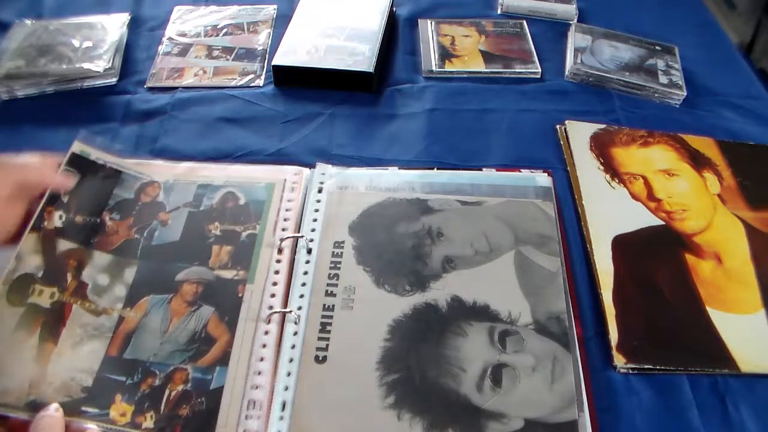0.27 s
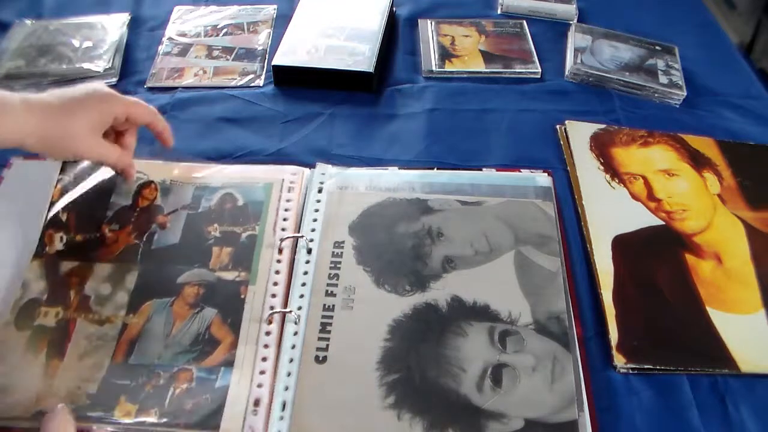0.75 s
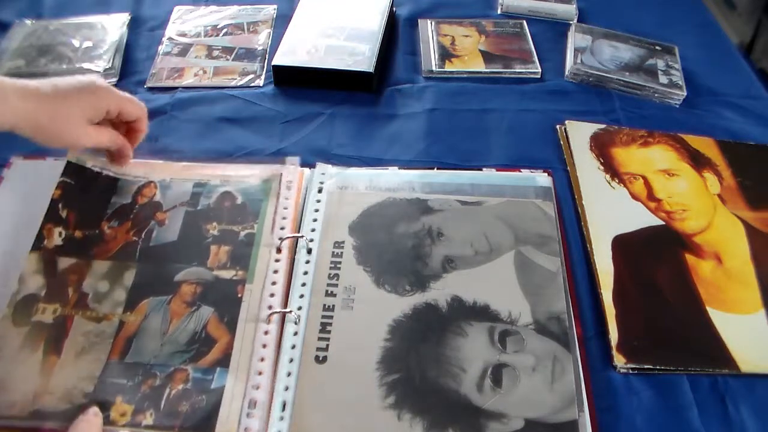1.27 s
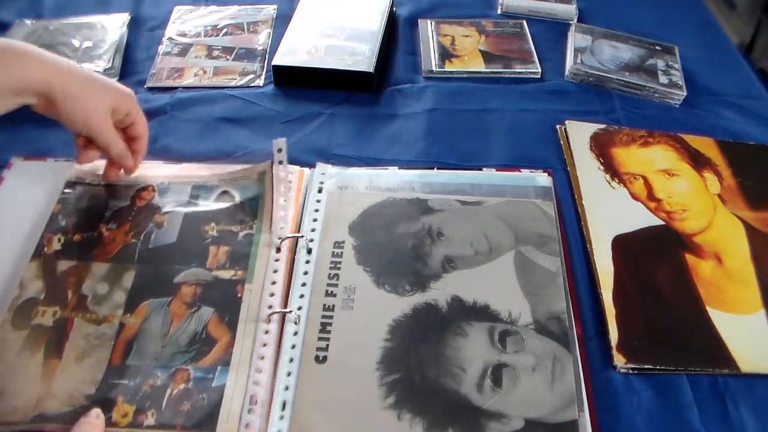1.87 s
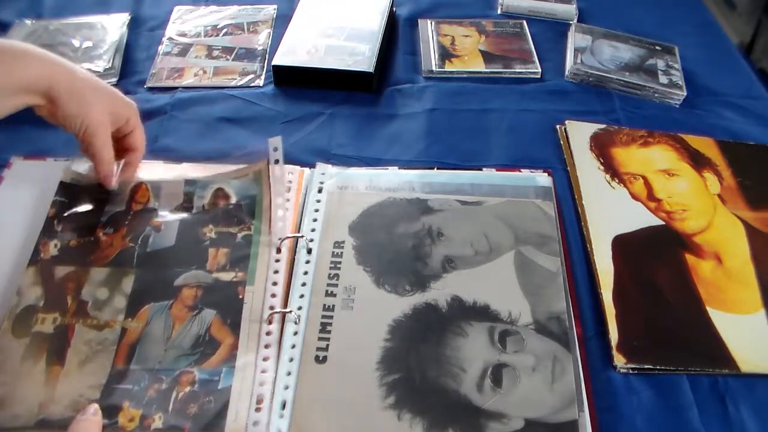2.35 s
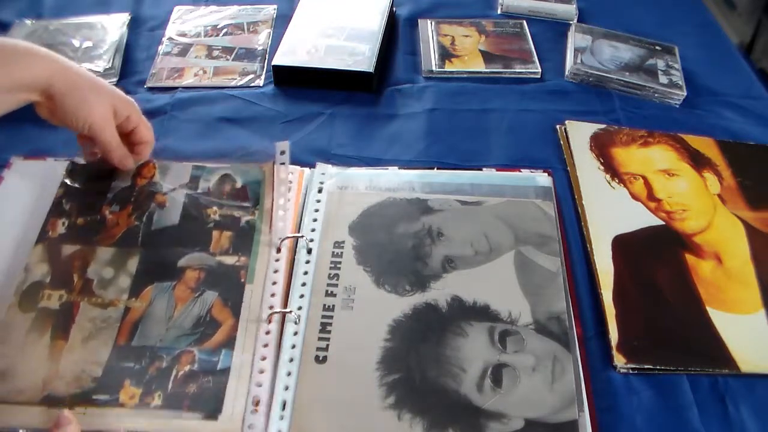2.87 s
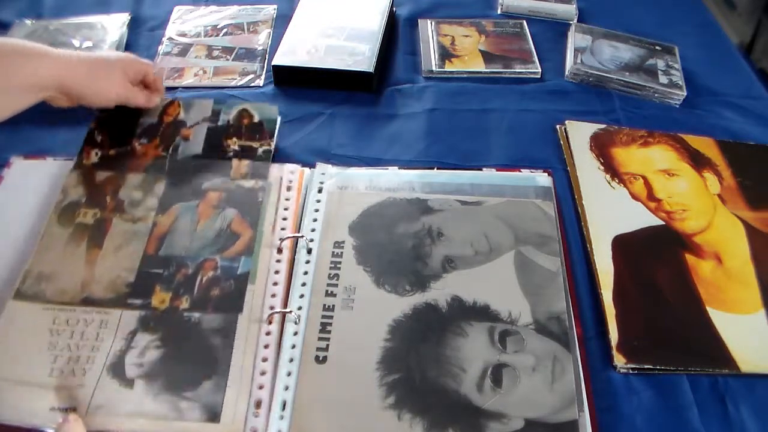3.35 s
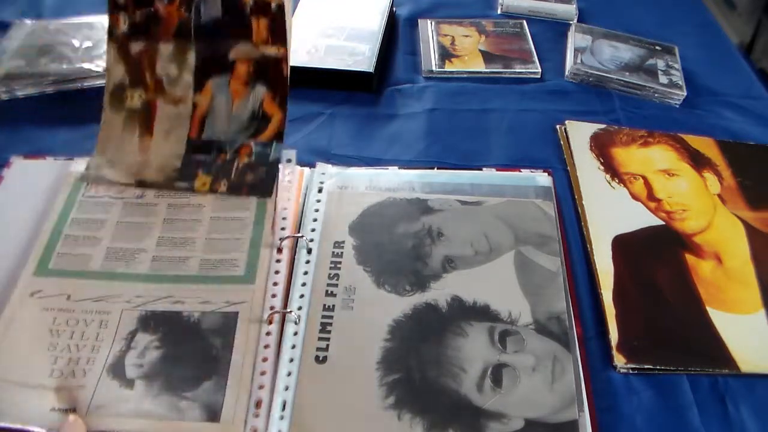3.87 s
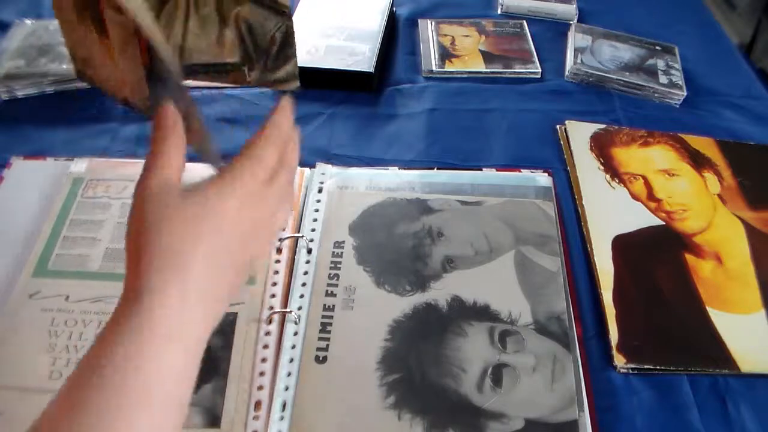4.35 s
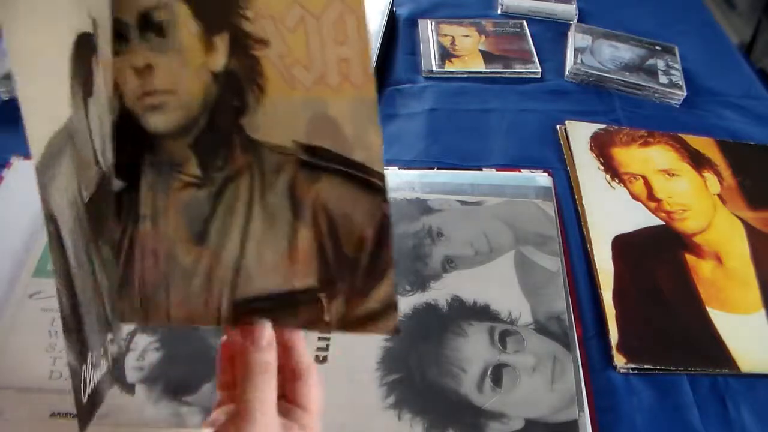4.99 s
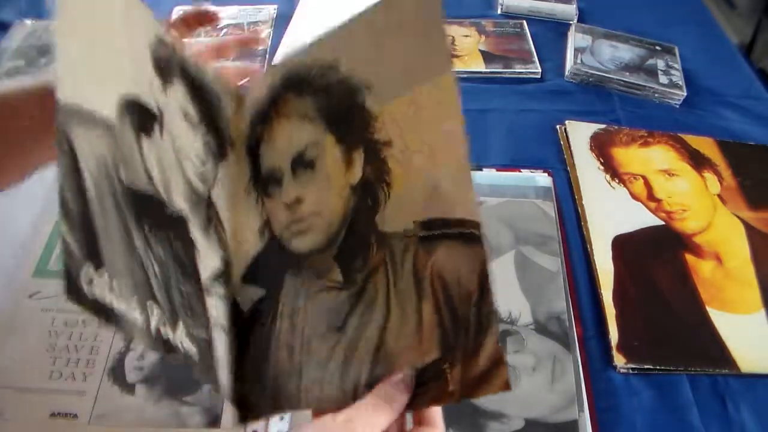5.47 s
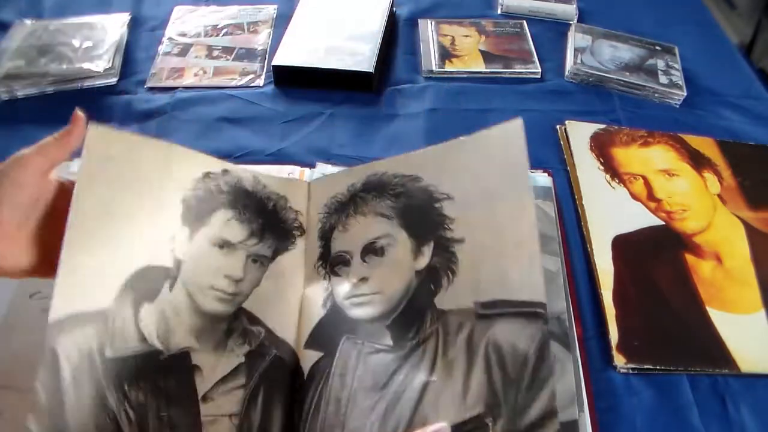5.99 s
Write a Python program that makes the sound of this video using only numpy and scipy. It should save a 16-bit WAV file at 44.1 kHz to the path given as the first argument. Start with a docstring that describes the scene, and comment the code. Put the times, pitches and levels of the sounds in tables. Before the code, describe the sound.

Close stereo pickup at a table in a small room. Fingers fuss with a clear plastic sleeve: quiet crinkles, dry ticks and thin hissing rubs in uneven tugs. A longer sliding pull draws a glossy sheet free with a few paper pops. The stiff sheet murmurs and buckles softly, fingertips brush it, then it snaps open loudly and rattles briefly. Faint rumble, hiss and low hum underneath.

```python
"""Fingers work a folded glossy sheet loose from a plastic binder sleeve, at a cloth-covered table in a small room.
The sleeve's crinkle, sliding hiss and rub are chance slips, ringing small facets and coloured by filters.
Creases snap as short bursts through resonances; the freed sheet murmurs, buckles in flurries and pops open.
Two close microphone ports hear it with short room reflections, over faint rumble, hiss and hum."""
import sys
import numpy as np
from scipy import signal
from scipy.fft import rfft, irfft, next_fast_len
from scipy.io import wavfile
from scipy.ndimage import uniform_filter1d

SR = 44100
rng = np.random.default_rng(int(sys.argv[2]) if len(sys.argv) > 2 else 0)


def generate_wav(sig):
    """Save sig (samples, or channels by samples) to the path in sys.argv[1] as 16-bit PCM at SR."""
    pcm = np.round(np.clip(np.atleast_2d(sig).T, -1, 1) * 32767).astype(np.int16)
    wavfile.write(sys.argv[1], SR, pcm)


N = 274610
TIME = np.arange(N) / SR  # seconds

# The long pull that draws the sheet free of the sleeve.
# Each row: time in seconds, sliding hiss drive in dB, crinkle drive in dB.
LONG_PULL = [(3.26, -59.5, -65), (3.45, -58.5, -69), (3.59, -62.5, -59), (3.78, -55, -67), (3.87, -48, -58),
             (3.94, -54, -50.5), (4.14, -56.5, -54), (4.21, -43.5, -47.5), (4.26, -66, -47.5)]
# Colour of the stiff paper. Each row: frequency in Hz, relative density in dB per Hz.
PAPER_COLOUR = [(70, -6), (130, -12), (300, 1), (550, 4), (800, -4.5), (1100, -4), (1650, -2.5),
                (2000, -6.5), (2450, -6), (3600, -7), (5000, -13), (8000, -13), (14000, -28)]


def from_db(db):
    """Decibels to gain."""
    return 10 ** (np.asarray(db) / 20)


def rms_one(x):
    """Scale to rms 1."""
    return x / np.sqrt(np.mean(x ** 2) + 1e-20)


def gains_in_time(rows):
    """One gain curve per dB column, fading quickly outside the span of the rows."""
    s, *columns = np.transpose(rows)
    outside = np.maximum(np.maximum(s[0] - TIME, TIME - s[-1]), 0)
    fade = np.exp(-outside / 0.013)
    return [from_db(np.interp(TIME, s, column)) * fade for column in columns]


def strokes(starts, lengths, levels_db):
    """Gain of finger strokes: each rises, holds for its length and dies away; overlaps add in power."""
    attack_s, release_s = 0.0073, 0.019
    power = 0
    for s, length, db in zip(starts, lengths, levels_db):
        # half way up at the start time
        attack = np.clip((TIME - s) / attack_s + 0.5, 0, 1)
        release = np.exp(-np.maximum(TIME - s - length, 0) / release_s)
        power = power + (from_db(db) * attack * release) ** 2
    return np.sqrt(power)


def at_hz(points, size):
    """Read a table on the frequency grid of an FFT, along log frequency."""
    hz, value = np.transpose(points)
    return np.interp(np.log(np.fft.rfftfreq(size, 1 / SR) + 1), np.log(hz), value)


def colour(x, spectrum):
    """Causal (minimum-phase) filter with the given spectrum; rms 1."""
    size = 2048
    # folding the cepstrum onto its first half puts the energy as early as it can be
    cepstrum = irfft(np.log(from_db(at_hz(spectrum, size))))
    cepstrum[1:size // 2] *= 2
    cepstrum[size // 2 + 1:] = 0
    response = irfft(np.exp(rfft(cepstrum)))
    return rms_one(signal.fftconvolve(x, response[None])[:, :x.shape[1]])


def resonate(x, hz, width_hz):
    """Two-pole resonance with gain 1 on top."""
    r = np.exp(-np.pi * width_hz / SR)
    zeros = np.array([1, 0, -1]) * (1 - r * r) / 2
    poles = [1, -2 * r * np.cos(2 * np.pi * hz / SR), r * r]
    return signal.lfilter(zeros, poles, x + 1e-18)


def low_pass(x, hz, order=2):
    """Butterworth low-pass."""
    return signal.sosfilt(signal.butter(order, min(hz, 0.45 * SR), fs=SR, output="sos"), x)


def high_pass(x, hz):
    """Butterworth high-pass."""
    return signal.sosfilt(signal.butter(2, min(hz, 0.45 * SR), "high", fs=SR, output="sos"), x)


def drift(rate):
    """Slow chance: straight lines between random knots of spread 1, so many knots a second."""
    knots = np.arange(0, TIME[-1] + 1, 1 / rate)
    return np.interp(TIME, knots, rng.standard_normal(len(knots)))


def grains(per_s, spread_db, size):
    """Tiny slips at random moments, mostly weak and a few strong; rows are mid and side; rms 1."""
    born = rng.random((2, size)) < per_s / SR
    strength = from_db(spread_db * np.minimum(rng.exponential(1, (2, size)), 4))
    sign = rng.choice([-1, 1], (2, size))
    return rms_one(born * strength * sign)


def facets(clicks, low_hz, high_hz, sharpness, count=14):
    """Each slip rings one small facet of the sheet, dealt at random, each with its own pitch; rms 1."""
    dealt = rng.integers(0, count, clicks.shape[1])
    pitches = np.geomspace(low_hz, high_hz, count)
    return rms_one(sum(resonate(clicks * (dealt == k), hz, hz / sharpness) for k, hz in enumerate(pitches)))


def sleeve_effort():
    """Gains of crinkle and hiss: a light hold, the tugs, and the two pulls."""
    # Fingers tug at the sleeve.
    # Each row: start in seconds, length in seconds, crinkle drive in dB, sliding hiss drive in dB.
    tugs = [(0.0, 0.025, -47, -60.5), (0.202, 0.014, -55.5, -61), (0.489, 0.1, -53.5, -60.5),
            (0.611, 0.19, -57, -68.5), (0.837, 0.086, -54.5, -79), (0.996, 0.18, -57.5, -57),
            (1.261, 0.22, -56, -56.5), (1.508, 0.088, -60, -57), (1.624, .09, -52, -52),
            (1.835, 0.2, -57.5, -55.5), (2.03, 0.11, -63.5, -59), (2.18, 0.1, -54, -49.5),
            (2.462, 0.13, -54.5, -54), (2.708, 0.065, -51.5, -53.5), (2.802, 0.055, -50, -50),
            (2.93, 0.056, -43, -61), (3.612, 0.046, -51.5, -57.5)]
    # The first, short pull. Each row: time in seconds, sliding hiss drive in dB, crinkle drive in dB.
    short_pull = [(2.87, -51, -54), (3.02, -51.5, -51), (3.12, -45.5, -51.5), (3.26, -62.5, -65)]
    hold_crinkle_db, hold_hiss_db = -63.5, -65.5
    starts, lengths, crinkle_db, hiss_db = np.transpose(tugs)
    pull_hiss, pull_crinkle = np.maximum(gains_in_time(short_pull), gains_in_time(LONG_PULL))
    # until the pulls begin the hand keeps a light hold on the film
    held = TIME < short_pull[0][0]
    crinkle = np.hypot(strokes(starts, lengths, crinkle_db), pull_crinkle + held * from_db(hold_crinkle_db))
    hiss = np.hypot(strokes(starts, lengths, hiss_db), pull_hiss + held * from_db(hold_hiss_db))
    return crinkle, hiss


def sleeve(crinkle, slide):
    """The film crinkles in clumps, hisses against the gloss and rubs on the pages below."""
    # Colours of crinkling film, sliding hiss and rub on the pages.
    # Each row: frequency in Hz, relative density in dB per Hz.
    film_colour = [(600, -21), (1050, -16.5), (1450, 5), (2100, 4.5), (2700, 4.5), (3500, 2), (4600, -1),
                   (7000, -4.5), (14000, -41)]
    slide_colour = [(1500, -29), (3500, 0.5), (5200, 0.5), (7000, 1.5), (8200, -1.5), (9500, 1.5),
                    (12000, -2.5), (14000, -3)]
    rub_colour = [(90, -12), (180, -9), (300, -3.5), (420, 7), (620, 1), (850, 2.5), (1200, -5),
                  (2500, -38)]
    # rub level at a usual crinkle, and the share of the crinkle's swing in dB that the rub follows
    rub_db, usual_crinkle_db, rub_follows = -64.5, -54, 0.69

    slips = grains(per_s=1400 * from_db(3.1 * drift(35)), spread_db=3.0, size=N)
    ringing = facets(slips, low_hz=1300, high_hz=7000, sharpness=6)
    film = colour(ringing + slips, film_colour)

    fine_slips = grains(per_s=8000 * from_db(2.8 * drift(60)), spread_db=0.5, size=N)
    hiss = colour(fine_slips + 0.39 * slips, slide_colour)

    page_slips = grains(per_s=2400, spread_db=4.0, size=N)
    pages = colour(slips + 0.28 * page_slips, rub_colour)
    rub = from_db(rub_db) * (crinkle / from_db(usual_crinkle_db)) ** rub_follows
    return from_db(-2.07) * crinkle * film + from_db(2.5) * slide * hiss + rub * pages


def background():
    """Even rumble and hiss from filtered noise, with a low electrical hum common to both ports."""
    # Colour of the room tone. Each row: frequency in Hz, relative density in dB per Hz.
    tone_colour = [(10, 2), (35, -6), (70, -2.5), (130, -8), (280, -12), (550, -15.5), (1200, -20),
                   (2700, -18.5), (7000, -23), (14000, -25.5)]
    # How alike the two ports hear the room tone. Each row: frequency in Hz, likeness from -1 to 1.
    tone_likeness = [(70, 0.11), (150, 0.18), (500, 0.12), (2000, 0), (6000, 0.039), (14000, 0)]
    # The hum's multiples in rising order. Each entry: rms level in dB.
    hum_levels_db = [-58.5, -64, -86, -84.5, -86]
    room_tone_db, hum_hz = -57.5, 25
    hiss = from_db(room_tone_db) * colour(rng.standard_normal((2, N)), tone_colour)
    hum = 0
    for k, db in enumerate(hum_levels_db, 1):
        cycles = k * hum_hz * TIME + rng.random()
        hum = hum + from_db(db) * np.sqrt(2) * np.sin(2 * np.pi * cycles)
    return ports(hiss, tone_likeness) + hum


def bends():
    """A bend runs through the paper as a swelling and fading flurry of buckles; the same kind of burst also
    gives a brief crinkle at the very start, as the fingers take hold."""
    # Flurries of buckles; the first row, at 0.015 s, is a brief crinkle as the fingers take hold. Each row:
    # time of the height in seconds, level there in dB, decay in seconds.
    flurries = [(0.015, -56, .02), (3.821, -44.5, 0.015), (3.863, -43.5, .011), (4.231, -37.5, 0.011),
                (4.28, -45.5, 0.027), (4.784, -50, 0.019), (4.879, -39.5, 0.021), (4.921, -45.5, 0.019),
                (5.315, -50, 0.017), (5.367, -36.5, 0.0095), (5.385, -43.5, .018), (5.482, -36.5, 0.044),
                (5.695, -40, 0.0048), (5.788, -23.5, 0.0085), (5.805, -23, 0.0039), (5.828, -34, 0.014),
                (5.852, -33, 0.017), (5.89, -34.5, .017), (5.983, -31.5, .011), (6.0, -35.5, 0.03),
                (6.125, -44, 0.052), (6.204, -27.5, 0.0079)]
    rise_share = 0.49  # rise time as a share of the decay
    # a harder bend is brighter: the band edge at a reference level, and the dB that raise it an octave
    reference_db, reference_hz, db_per_octave = -35.5, 3050, 18.5
    out, size = np.zeros((2, N)), SR // 2
    for s, db, decay in flurries:
        rise = rise_share * decay
        bright_hz = reference_hz * 2 ** ((db - reference_db) / db_per_octave)
        start = max(round(s * SR) - size // 3, 0)
        t = (start + np.arange(size)) / SR - s
        swell = np.exp(np.where(t < 0, -(t / rise) ** 2 / 2, -t / decay))
        slips = grains(per_s=2800, spread_db=3.0, size=size)
        buckles = facets(slips, low_hz=837, high_hz=6020, sharpness=6.6) + 1.22 * slips
        # a tighter bend moves smaller facets: both edges of its band go up together
        buckles = high_pass(low_pass(buckles, bright_hz), hz=0.38 * bright_hz)
        flurry = from_db(db) * swell * colour(buckles, PAPER_COLOUR)
        out[:, start:start + size] += flurry[:, :N - start]
    return out


def creases(slide):
    """Every flip of film or paper: (s, ring dB, pitch Hz, crisp edge dB, thud dB, run-on s)."""
    # Creases in the film snap through. Each row: time in seconds, ring level over 5 ms in dB,
    # crisp edge in dB re the ring, thud on the pages in dB re the ring.
    film_snaps = [(0.2945, -53, -15, -6), (0.4315, -69.5, 21, -4), (0.4949, -43.5, -12, -6),
                  (0.5005, -50.5, -5, 0), (0.6781, -48.5, -4, -8), (0.896, -56.5, -15, 2.5),
                  (1.094, -50.5, 7.5, -7), (1.1634, -56, 2, -2), (1.3957, -44.5, 2.5, -13),
                  (1.415, -58, 10.5, -18), (1.4645, -45.5, -22, -12), (1.6087, -50, 8.5, -22),
                  (1.639, -49.5, 6, 2), (1.6478, -44, 1.5, -11), (1.9602, -42.5, -2, -14),
                  (1.982, -49.5, 6.5, -7), (2.1879, -42.5, -8, -16), (2.1948, -47, 2, -2),
                  (2.2138, -35, -1.5, -9), (2.2734, -42.5, -5, -2.5), (2.4258, -53, 9.5, -23),
                  (2.4592, -47, 7, -7), (2.4764, -53.5, 10, 1.5), (2.518, -46.5, 0, -24),
                  (2.5894, -49.5, 6.5, -20), (2.7558, -51, 7, -4), (2.8091, -47, -5, -13),
                  (2.843, -44, 1, -23), (2.963, -46, -18, -6), (3.0906, -41, -1, -25),
                  (3.2114, -46, -17, -7.5)]
    # The stiff paper pops. Each row: time in seconds, ring level over 5 ms in dB, pitch in Hz,
    # crisp edge in dB re the ring, thud in dB re the ring, run-on in seconds.
    paper_pops = [(3.8124, -38.5, 1710, -11, -10.5, 0.009), (3.852, -33, 1330, -4.5, -7.5, 0.0023),
                  (4.115, -45, 1590, -8, -13, 0.0036), (4.2192, -36.5, 1470, -5, -26, 0.007),
                  (4.4665, -31.5, 2040, -1.5, -30, 0.0031), (4.7505, -46.5, 3700, -20, -9, 0.012),
                  (5.2206, -33.5, 1580, -5.5, -12.5, 0.012), (5.7786, -23.5, 1470, -23, -15, 0.048),
                  (6.0481, -36, 1430, -18, -19, 0.00026)]
    film_hz, pitch_spread_oct, film_run_on_s = 2080, 0.14, 0.0057
    ticks_per_s, tick_re_hiss_db, tick_spread_db = 14, -5.5, 3
    tick_crisp_db, tick_thud_db = 6, -8

    # faint snaps come at random while the sleeve is worked
    worked = TIME < LONG_PULL[-1][0]
    born = np.flatnonzero(worked & (rng.random(N) < ticks_per_s / SR))
    scatter = rng.uniform(-1, 1, len(born))
    tick_db = 20 * np.log10(slide[born]) + tick_re_hiss_db + tick_spread_db * scatter
    ticks = [(s, db, tick_crisp_db, tick_thud_db) for s, db in zip(TIME[born], tick_db)]

    flips = list(paper_pops)
    for s, db, crisp_db, thud_db in list(film_snaps) + ticks:
        hz = film_hz * 2 ** (pitch_spread_oct * rng.uniform(-1, 1))
        flips.append((s, db, hz, crisp_db, thud_db, film_run_on_s))
    return flips


def snaps(flips):
    """A crease flips with a crack and a short run of after-slips; it rings, spits treble and thumps the pages."""
    # Colours of the treble spit and of the thump. Each row: frequency in Hz, relative density in dB per Hz.
    crisp_colour = [(2000, -5.5), (3800, 9), (5000, 10.5), (7000, 12.5), (9000, 10.5), (14000, 4.5)]
    thud_colour = [(70, -12), (160, -2.5), (250, 3), (430, 7), (650, 8.5), (950, -2.5), (2000, -37.5)]
    out, size = np.zeros((2, N)), 2048
    t = np.arange(size) / SR
    to_five_ms = np.sqrt(0.005 * SR / size)  # states the ring's energy as a level over 5 ms
    for s, db, hz, crisp_db, thud_db, run_on in flips:
        run_on = max(run_on, 1e-4)
        after_slips = grains(per_s=12000, spread_db=0.5, size=size)
        push = rms_one(after_slips * np.exp(-t / (0.48 * run_on)))
        # a quick flip puts most of its force in the first crack
        crack = 1.6 * np.exp(-run_on / 0.011) * np.sqrt(size)
        push[:, 4] += crack * rng.choice([-1, 1], 2)
        ring = rms_one(resonate(resonate(push, hz, 0.66 * hz), hz, 5.2 * hz))
        # the treble comes from the first instant of the flip
        spit = colour(push * np.exp(-t / 0.0051), crisp_colour)
        thud = colour(push, thud_colour)
        snap = ring + from_db(crisp_db) * spit + from_db(thud_db) * thud
        start = round(s * SR)
        out[:, start:start + size] += (from_db(db) * to_five_ms * snap)[:, :N - start]
    return out


def sheet_effort():
    """Gains of flexing and of fingers brushing the gloss."""
    # The free sheet flexes as it is lifted, then unfolded. Each row: time in seconds, flexing drive in dB.
    lift = [(4.26, -58), (4.32, -57), (4.45, -62), (4.71, -62.5), (4.78, -54.5), (4.92, -45), (5.0, -61.5),
            (5.09, -64)]
    unfold = [(5.125, -51), (5.28, -53.5), (5.48, -46), (5.6, -49.5), (5.71, -50.5), (5.77, -58.5),
              (5.82, -35.5), (5.95, -46), (6.22, -41)]
    # Fingertips brush over the gloss. Each row: start in seconds, length in seconds, drive in dB.
    brush_strokes = [(4.618, 0.039, -61), (4.909, 0.01, -55.5), (5.112, 0.083, -57.5),
                     (5.213, 0.095, -50.5), (5.356, 0.013, -49), (5.521, 0.036, -49)]
    flex, = np.maximum(gains_in_time(lift), gains_in_time(unfold))
    # the grip slips a little whenever the sheet flexes
    grip_slip = from_db(-19.5) * flex
    return flex, np.hypot(strokes(*np.transpose(brush_strokes)), grip_slip)


def sheet():
    """Stiff paper murmurs as it flexes, thinner once open and taut; it fans the air, and fingertips brush it."""
    # Colour of fingertips on gloss. Each row: frequency in Hz, relative density in dB per Hz.
    brush_colour = [(1200, -26), (2500, 0), (4000, 0), (6000, -1), (7500, -1), (9300, -1.5), (14000, -9)]
    pop_open_s = 5.78
    flex, brush = sheet_effort()
    slips = grains(per_s=2000 * from_db(2.7 * drift(40)), spread_db=3.0, size=N)
    ringing = facets(slips, low_hz=758, high_hz=4600, sharpness=10.0)
    body = colour(low_pass(ringing + slips, hz=1800), PAPER_COLOUR)
    body = np.where(TIME < pop_open_s, body, high_pass(body, hz=1090))
    air = rms_one(resonate(rng.standard_normal((2, N)), hz=145, width_hz=290))
    gloss = colour(grains(per_s=12000, spread_db=3, size=N), brush_colour)
    flexing = flex * (from_db(-2.0) * body + from_db(-20.5) * air)
    return flexing + from_db(1.8) * brush * gloss


def room(x, wet_db):
    """Adds quickly dying reflections; as the hands move, one pattern of them gives way to another."""
    t60_s = 0.17
    t = np.arange(SR // 2) / SR
    shape = (1 - np.exp(-(t / 0.0011) ** 2)) * from_db(-60 * t / t60_s)
    place = 2 * np.pi * TIME / 0.3
    out = x
    for share in np.cos(place), np.sin(place):
        # a cluttered room favours no pitch: the broad humps of the reflections are evened out
        spectrum = rfft(rng.standard_normal((2, len(t))) * shape)
        humps = np.sqrt(uniform_filter1d(np.abs(spectrum) ** 2, size=60))
        even = irfft(spectrum / humps, len(t))
        tail = low_pass(even[:, :SR // 3], hz=9050, order=1)
        tail /= np.sqrt(np.sum(tail ** 2, axis=1, keepdims=True))
        out = out + from_db(wet_db) * signal.fftconvolve(x * share, tail, axes=1)[:, :N]
    return out


def ports(x, likeness):
    """Mid and side to left and right, mixed at each frequency by how alike the two ports hear it."""
    # Balance of the ports. Each row: frequency in Hz, left minus right in dB.
    port_balance = [(100, 0), (2300, -0.5), (4300, -1), (6000, -2), (8500, 1.5), (14000, 1.5)]
    size = next_fast_len(N + SR // 10, True)
    mid, side = rfft(x, size)
    alike = np.clip(at_hz(likeness, size), -0.99, 0.995)
    lean = from_db(at_hz(port_balance, size) / 2)
    mid = mid * np.sqrt((1 + alike) / 2)
    side = side * np.sqrt((1 - alike) / 2)
    return irfft(np.array([(mid + side) * lean, (mid - side) / lean]), size)[:, :N]


def scene():
    """Sleeve and sheet in the room; the fingers catch and let go, so the sleeve rustles in small jerks."""
    # How alike the ports hear near sounds: together up to the middle range, parting in the treble.
    # Each row: frequency in Hz, likeness from -1 to 1.
    near_likeness = [(100, 1), (1000, 0.98), (2200, 0.93), (3600, 0.92), (5000, 0.44), (7000, -0.12),
                     (14000, -0.11)]
    crinkle, slide = sleeve_effort()
    jerks = from_db(1.6 * drift(30))
    sleeve_rustle = room(sleeve(crinkle, slide) * jerks, wet_db=-9.5)
    sheet_rustle = room(sheet() + bends(), wet_db=-11.5)
    cracks = room(snaps(creases(slide)), wet_db=-8.0)
    return ports(sleeve_rustle + sheet_rustle + cracks, near_likeness) + background()


def record(dry):
    """The top is cut steeply above 14.2 kHz by an elliptic low-pass."""
    return signal.sosfilt(signal.ellip(12, 0.2, 70, 14200, fs=SR, output="sos"), dry)


dry = scene()
out = record(dry)
generate_wav(out)
```